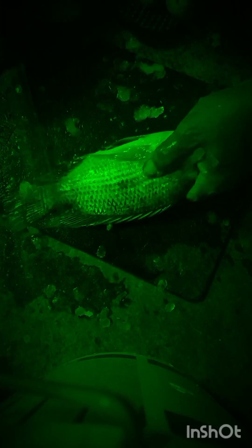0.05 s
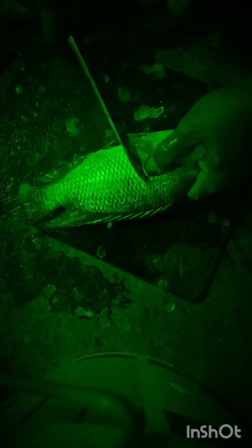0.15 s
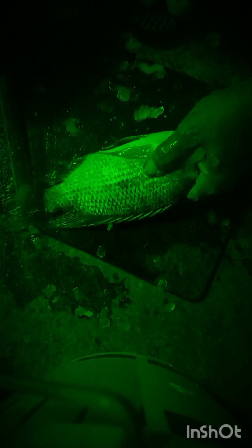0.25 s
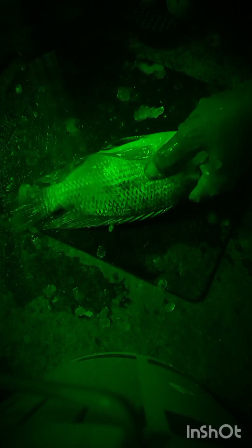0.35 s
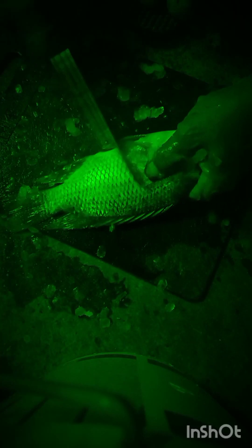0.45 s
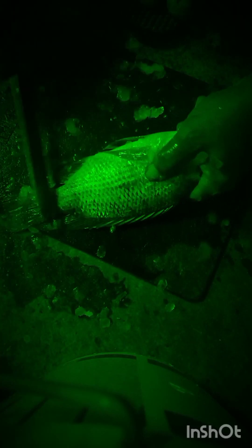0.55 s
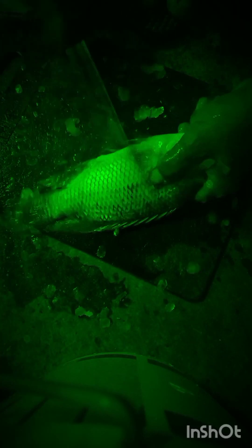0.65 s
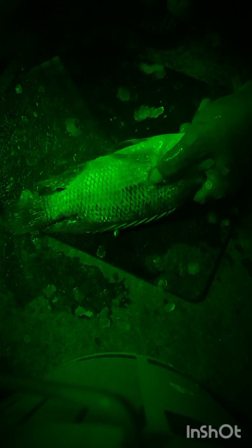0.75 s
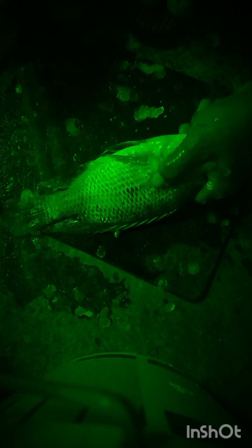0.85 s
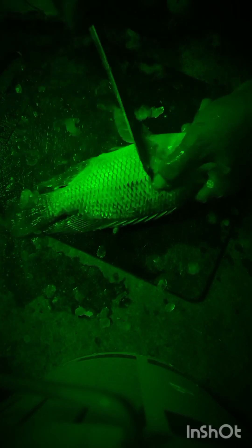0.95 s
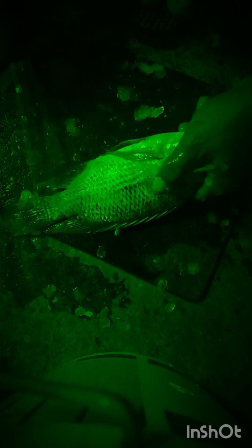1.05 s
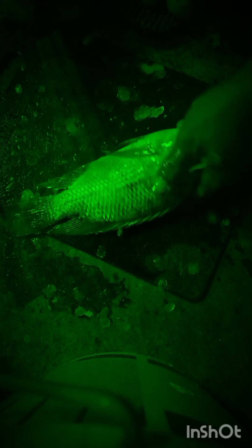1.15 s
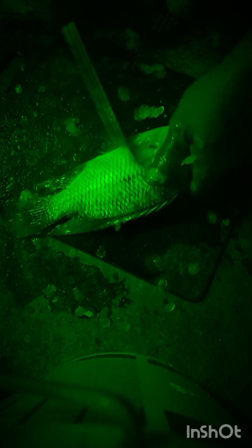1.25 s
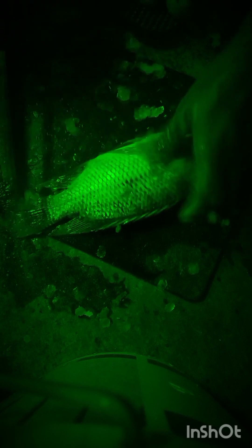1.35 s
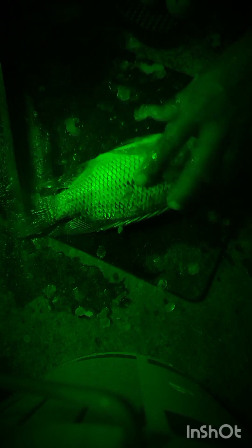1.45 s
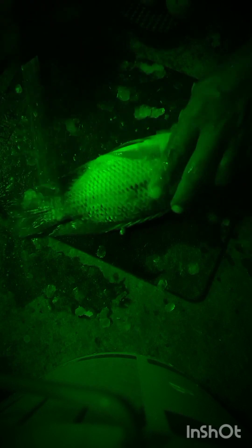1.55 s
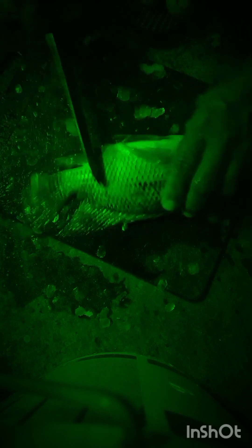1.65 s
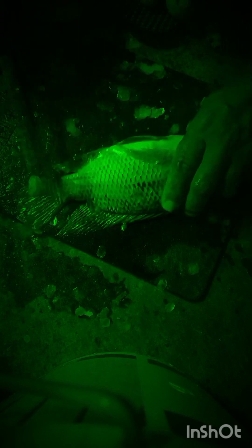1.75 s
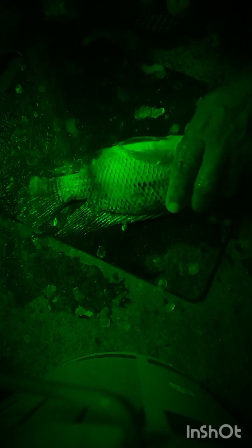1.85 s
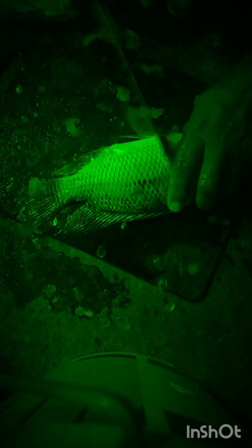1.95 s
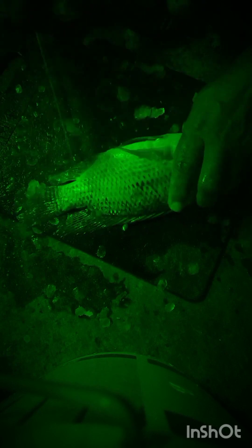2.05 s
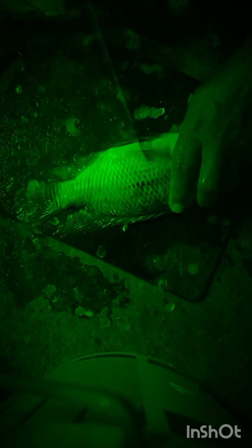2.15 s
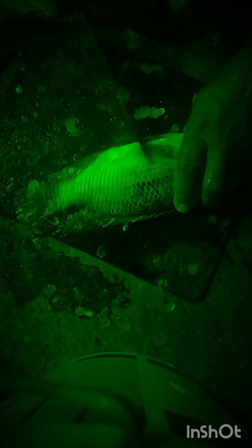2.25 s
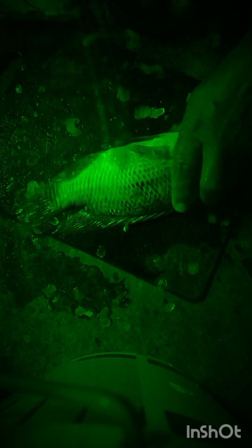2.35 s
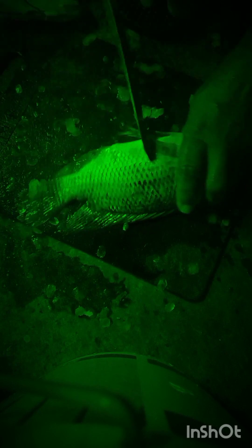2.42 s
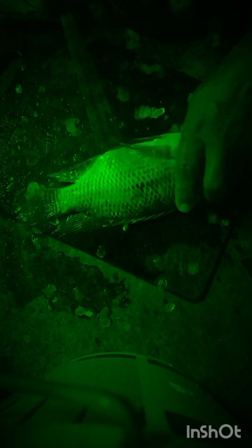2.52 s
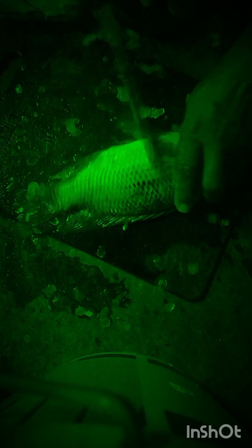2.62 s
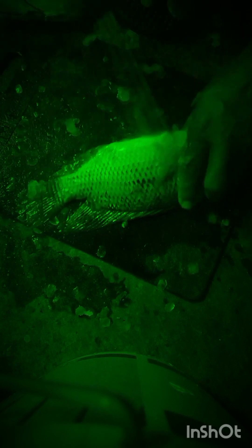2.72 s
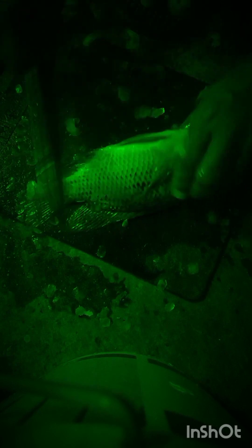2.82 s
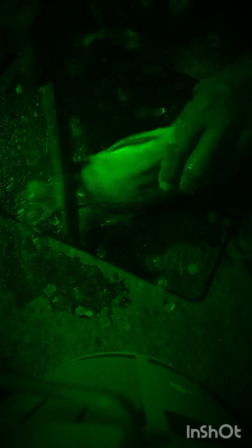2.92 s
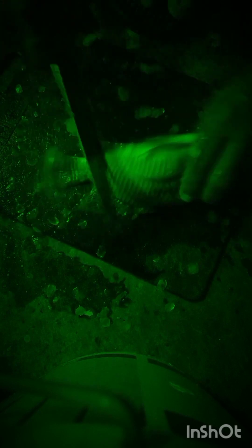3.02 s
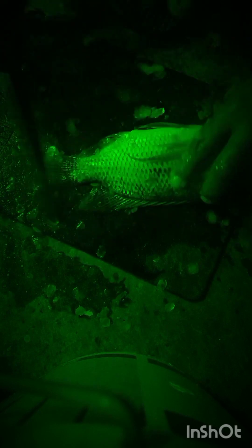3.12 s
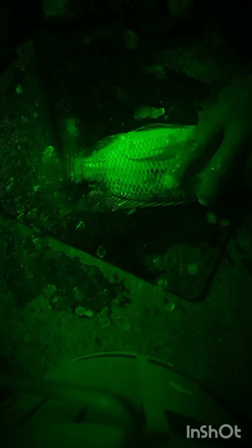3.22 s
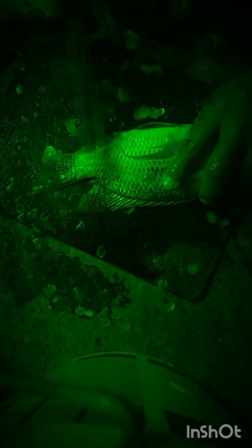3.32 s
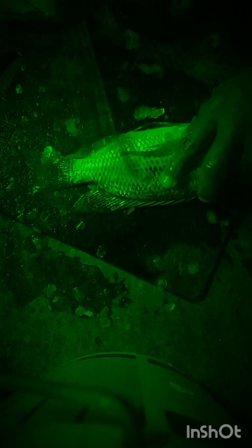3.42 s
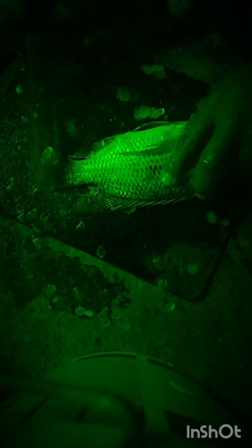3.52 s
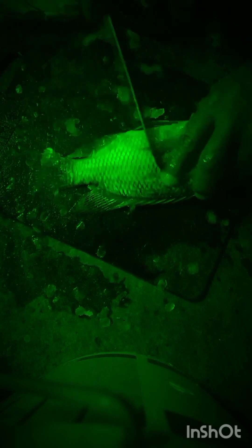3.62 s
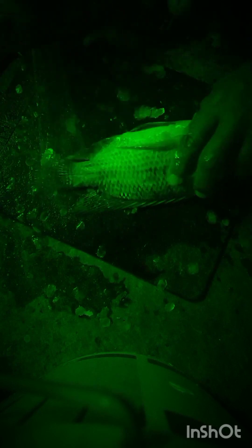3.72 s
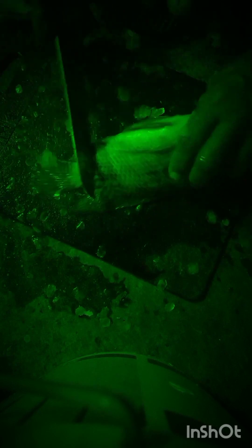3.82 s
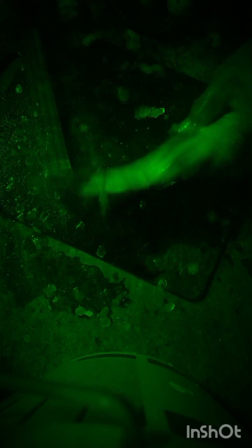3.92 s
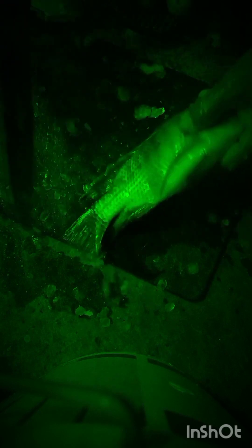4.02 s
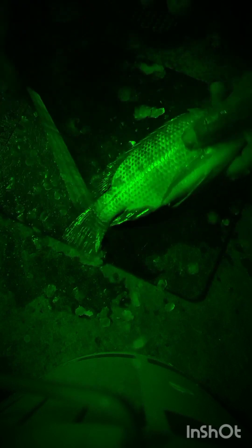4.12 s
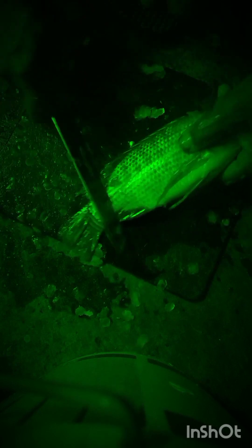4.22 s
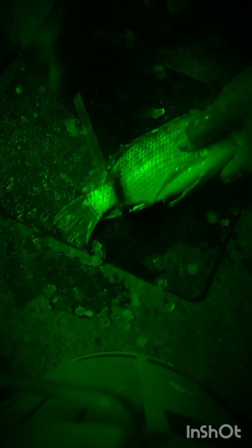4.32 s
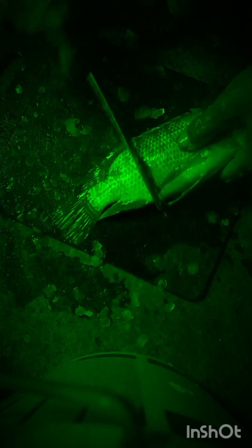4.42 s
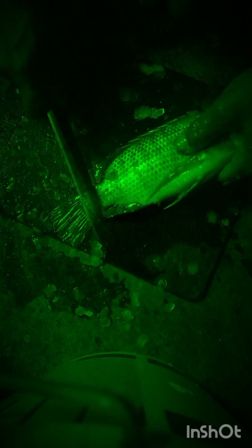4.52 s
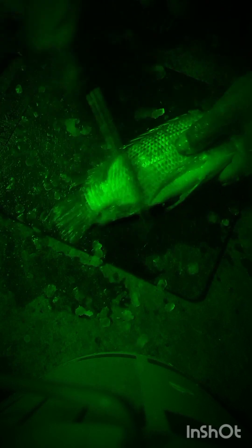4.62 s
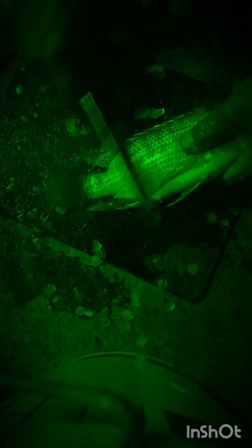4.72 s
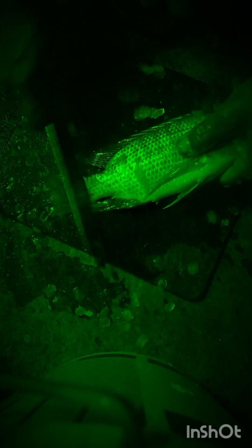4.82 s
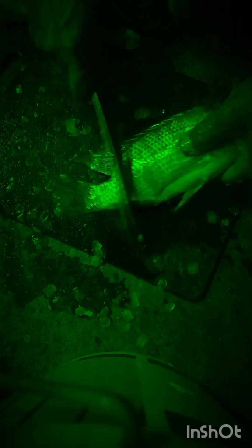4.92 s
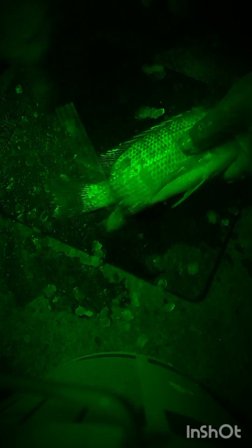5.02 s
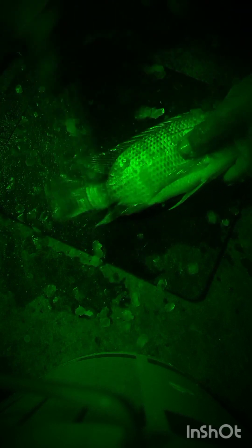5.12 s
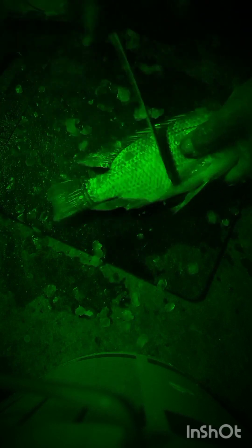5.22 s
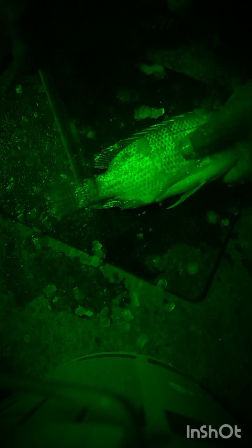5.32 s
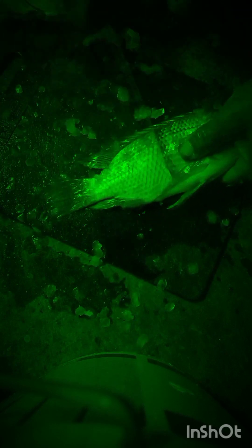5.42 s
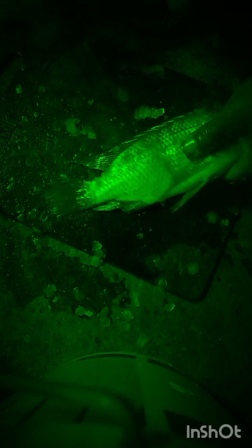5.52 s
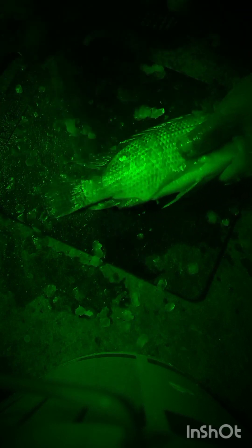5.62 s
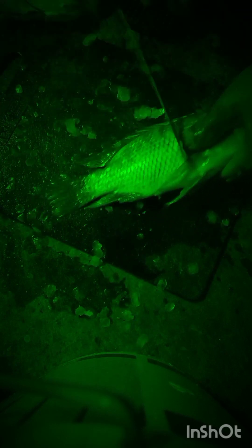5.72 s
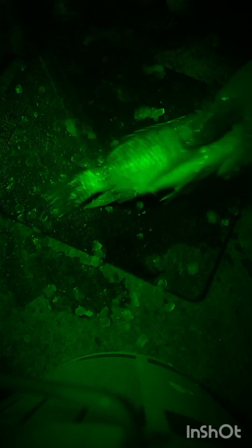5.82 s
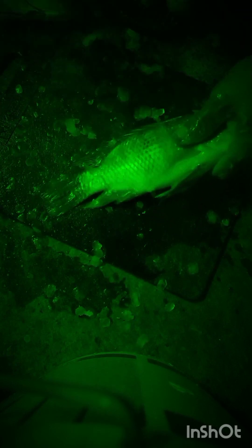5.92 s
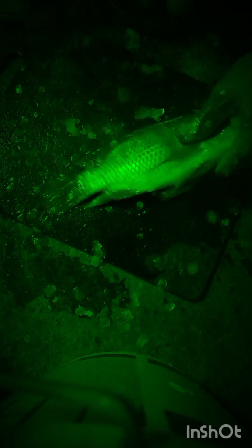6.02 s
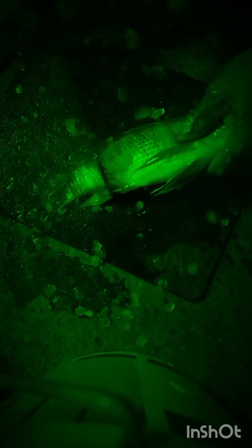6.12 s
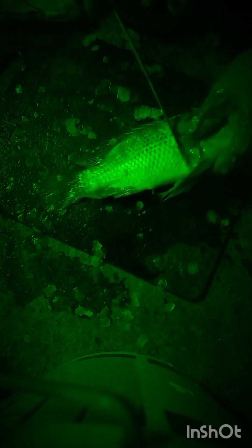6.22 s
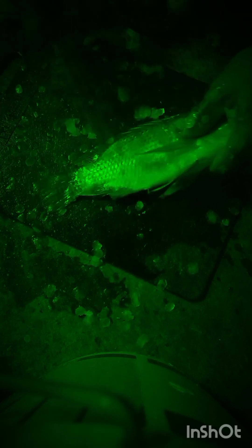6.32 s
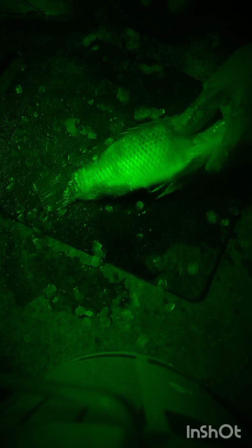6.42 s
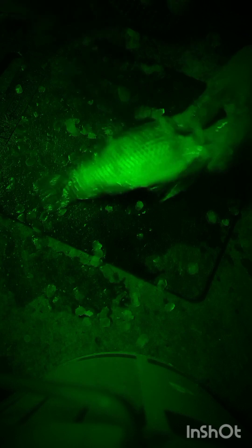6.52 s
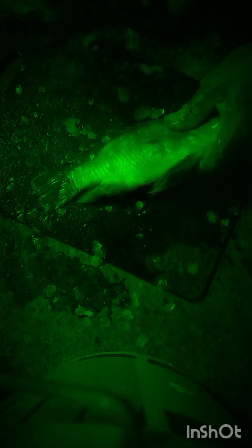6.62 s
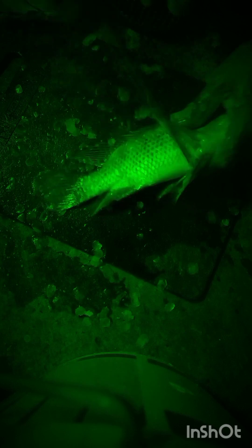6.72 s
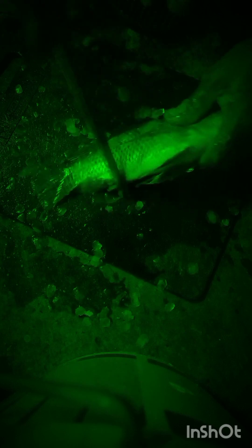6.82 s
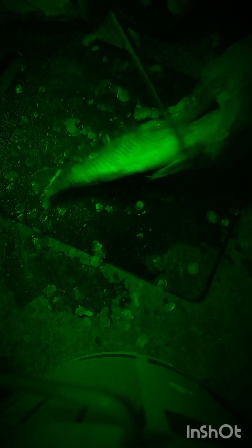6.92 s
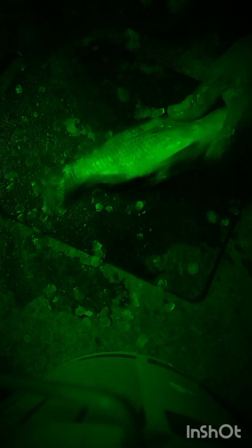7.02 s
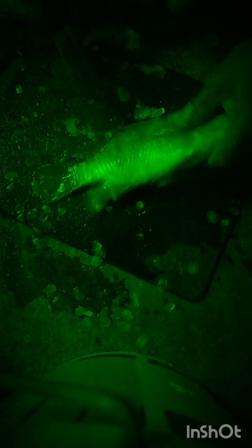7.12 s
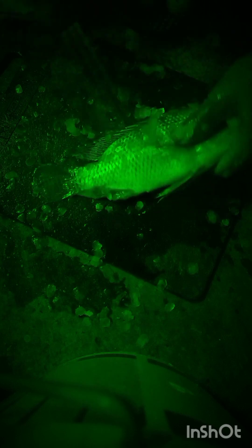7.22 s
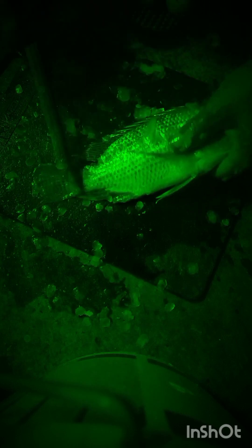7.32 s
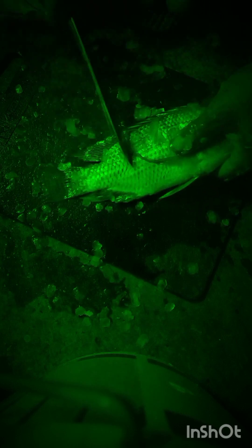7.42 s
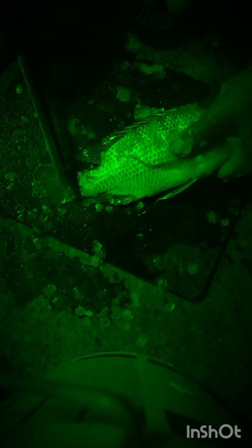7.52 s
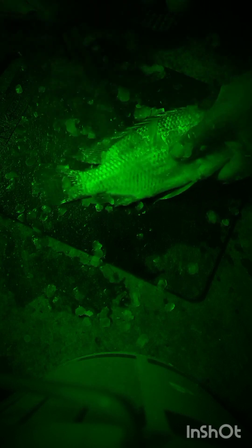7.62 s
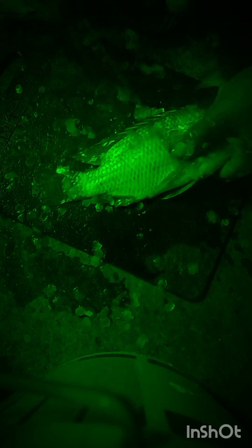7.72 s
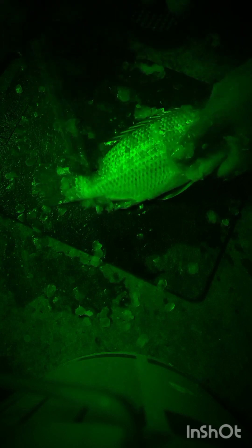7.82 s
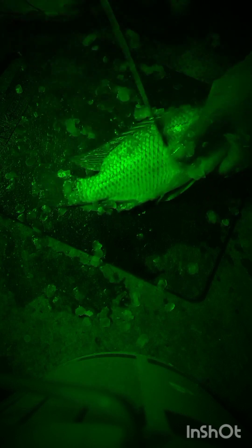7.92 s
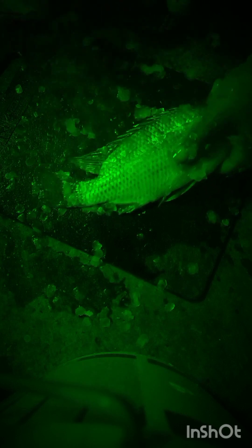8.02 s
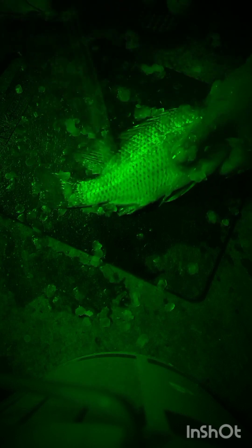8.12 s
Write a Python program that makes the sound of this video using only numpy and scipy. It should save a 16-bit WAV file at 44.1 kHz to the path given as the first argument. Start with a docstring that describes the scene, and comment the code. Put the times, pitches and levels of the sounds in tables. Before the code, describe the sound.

A knife scales a wet fish on a board, close to a stereo phone microphone outdoors at night. From 0.1 s short rasping strokes come about four a second, each a dense gritty crackle of scales with thin steel ring, soft wet drag and hollow board chatter. Tiny flicks and snaps tick between them. A dull double knock falls at 1.6 s, before lighter strokes. From 2.6 to 3.2 s the scraping turns faint, then firms up with small knocks; a wider gap follows 3.9 s. At 4.4 s strong scraping returns, densest from 4.5 to 5.8 s, with sharp scale cracks and cushioned thuds. From 6 to 7.2 s it is steadier and lighter, the ring slightly lower; from 7.4 s strokes become brighter and crisper until 8.1 s. Close reflections and a faint yard tail surround it, over a low distant drone and fluttering insect-like shrill.

```python
"""Scaling a fish at night

Outdoors, a knife scrapes a fish on a board, about four strokes a second, heard by a phone close by.
Each stroke is a dense run of scale edges letting go, with blade ring, wet skin drag and board chatter:
random slips, filtered and faded in and out. Light flicks, snapping scales (short noise bursts) and
knocks (filtered impulses) come among them. Close reflections and a faint yard tail surround the work;
a distant drone and a thin insect-like shrill, both coloured noise, lie behind."""
import sys
import numpy as np
from scipy import signal
from scipy.fft import rfft, irfft, next_fast_len
from scipy.io import wavfile
from scipy.ndimage import map_coordinates

SR = 44100
rng = np.random.default_rng(int(sys.argv[2]) if len(sys.argv) > 2 else 0)


def dump_mix(stems):
    """Bounce the given channels to the path in sys.argv[1] as a 16-bit WAV at rate SR."""
    frames = np.atleast_2d(stems).T  # one column per channel
    limited = np.clip(frames, -1, 1)  # hard clip at full scale
    pcm = np.round(limited * 32767).astype(np.int16)
    wavfile.write(sys.argv[1], SR, pcm)


N = 359756  # samples

# All levels in the tables are relative: mix gains and filters follow.
# Working strokes against the scales. Each row: start in seconds, lead-in in seconds, length in seconds,
# scale rasp in dB, blade ring in dB, skin drag in dB, board chatter in dB, board note in Hz,
# rasp brightness in dB.
STROKES = [(0.114, 0.0092, 0.091, -39.5, -59, -51.0, -46, 801.4, 5.5),
           (0.387, 0.053, 0.075, -39.5, -54, -54.5, -44.5, 762.6, -2.5),
           (0.67, 0.013, 0.07, -43.5, -48.5, -56, -45.5, 719.5, -4),
           (0.924, 0.038, 0.061, -42, -46, -56, -49, 948, -1.5),
           (1.184, 0.051, 0.06, -46.5, -50, -59.5, -54.5, 863, -7),
           (1.623, 0.021, 0.04, -43.5, -52, -50.5, -43.5, 831, 4),
           (1.951, 0.05, 0.042, -47.5, -51.0, -56, -52.5, 726, -5),
           (2.184, 0.02, 0.035, -42.5, -46, -60, -56, 726, -1),
           (2.418, 0.01, 0.03, -46, -42.5, -57.5, -56.5, 710.0, 2),
           (2.658, 0.046, 0.084, -52, -57.5, -66, -69.0, 902, -2.5),
           (2.971, 0.01, 0.13, -57, -62.5, -80, -64.5, 852, 1),
           (3.158, 0.01, 0.065, -50, -44, -57.5, -47.5, 844.7, -8.5),
           (3.363, 0.031, 0.055, -45.5, -48.5, -59, -48, 873, 1),
           (3.606, 0.027, 0.064, -43, -47, -52, -39.5, 902, 0),
           (3.826, 0.042, 0.064, -50.5, -54, -59, -49.0, 821.4, -5),
           (4.369, 0.042, 0.073, -38, -47.0, -58, -56, 995, -2.5),
           (4.644, 0.033, 0.062, -34.5, -42.5, -49.5, -46.0, 1023, -0.5),
           (4.916, 0.034, 0.061, -40.5, -41, -47, -42.5, 960, -1),
           (5.184, 0.052, 0.094, -36.5, -41, -51, -44.5, 982, 0.5),
           (5.43, 0.015, 0.053, -39, -47, -47, -39.5, 1072, -4.5),
           (5.71, 0.04, 0.0659, -40, -43, -52, -44, 986.5, -3),
           (5.94, 0.012, 0.057, -37, -42.5, -55.5, -50.0, 900.6, -2),
           (6.209, 0.028, 0.033, -40, -44, -50.0, -49.5, 744.3, -2),
           (6.454, 0.027, 0.035, -41.5, -44, -55, -54.5, 726.0, -1.5),
           (6.654, 0.012, 0.061, -45, -45.5, -57.5, -58, 660.0, 1),
           (6.905, 0.0093, 0.036, -46.5, -45.5, -58, -55.5, 648, 4.5),
           (7.161, 0.012, 0.047, -45.5, -51, -65.5, -58, 701.4, -1),
           (7.406, 0.026, 0.055, -44, -52, -56, -43.0, 911, 8.5),
           (7.638, 0.031, 0.072, -46, -46, -50.0, -41, 949.6, 11),
           (7.899, 0.026, 0.057, -37, -43.5, -51.5, -47, 990.5, 0.5)]
# Light flicks and return passes of the edge. Each row: start in seconds, length in seconds,
# scale rasp in dB, blade ring in dB, push on the fish in dB.
FLICKS = [ (0.02, 0.011, -49, -85, -95), (0.265, .06, -57, -67, -61), (0.513, 0.041, -62, -72, -64),
          (0.55, 0.085, -60, -83, -65.5), (0.901, 0.021, -59, -71, -62), (1.09, .045, -76, -65, -70),
          (1.592, .026, -66, -70, -49), (1.767, 0.017, -59, -65, -67.5), (2.065, .06, -60, -63, -73),
          (2.338, 0.05, -51, -60.5, -68), (2.537, 0.076, -60.5, -66, -98), (3.035, 0.031, -64, -66, -59),
          (3.312, 0.057, -53, -54, -76), (3.745, 0.066, -56.5, -61, -62.5),
          (3.918, 0.049, -58.5, -59, -60.5), (4.046, .025, -58.5, -75, -62.5),
          (4.266, 0.017, -48.5, -53.5, -89), (4.539, 0.016, -31.5, -66, -60.5),
          (4.563, 0.034, -42, -44.5, -58.5), (4.745, .045, -45, -61, -81), (4.797, .025, -38, -63, -57),
          (4.842, 0.018, -42, -48, -54.5), (5.052, 0.016, -41, -42.5, -69), (5.1, 0.017, -56, -50, -62.5),
          (5.152, 0.035, -48, -63, -59), (5.36, .04, -51.5, -73, -53.5), (5.501, 0.018, -44, -40, -56),
          (5.6, 0.03, -49, -57, -57), (5.857, 0.023, -51, -58, -61), (6.098, 0.025, -50, -51, -63.5),
          (6.172, 0.017, -44.5, -46.5, -53), (6.357, .03, -54, -61.5, -77), (6.577, 0.037, -52, -55, -60),
          (6.808, 0.037, -51, -51.5, -64), (7.538, 0.05, -48.5, -64, -55.5), (7.787, 0.057, -61, -69, -62),
          (8.087, 0.022, -52, -72, -84)]
# How a layer follows a stroke or flick. Each holds: rise over the lead-in in dB, sag at both ends of
# the hold in dB, growth over the hold in dB, fall in dB per second.
RASP_SHAPE = (23, 3.7, 0.54, 490)
RING_SHAPE = (18.3, 1.7, 0.38, 400)
SKIN_SHAPE = (21, 3.6, 4.8, 370)
BOARD_SHAPE = (13, 6.5, -4, 362)
FLICK_SHAPE = (16.5, 1.7, 0.3, 690)
FLICK_LEAD_S = 0.013
# The hand and resting blade keep rubbing the wet fish. Each row: time in seconds, level in dB.
HANDLING = [(0, -58.5), (1.25, -60.5), (1.42, -77.5), (1.9, -74), (2.101, -61.5), (2.72, -74), (2.881, -77),
            (3.05, -74), (4.221, -79.5), (4.65, -50), (5.35, -53), (5.9, -60), (6.7, -61.5), (7.0, -62.5),
            (7.6, -65), (8.15, -62)]
# Share of the handling in rasp, ring, skin and board, in dB.
HANDLING_MIX_DB = (-1, -6, -14, -16)
# How far rasp, ring, skin and board follow the unevenness, as a factor on its dB.
CATCH_SHARE = (1.15, 0.36, 1.45, 0.61)
HANDLING_UNEVEN_DB, GRIP_UNEVEN_DB = 2.5, 1.2  # the edge catches and skids; before CATCH_SHARE
# Colour of the scale contacts. Each row: frequency in Hz, gain in dB.
RASP_COLOUR = [(1500, -43), (2600, -9), (3600, -1.5), (6000, 1), (11000, 1), (16000, 0.5)]
RASP_SPLIT_HZ = 7600  # brightness tips the rasp about this frequency
# High modes of the steel blade. Each row: centre in Hz, width in Hz, level in dB.
BLADE_MODES = [(5380, 150, -8.5), (6210, 150, -7), (11200, 50, -22), (12200, 91, 2)]
# Bending modes of the hand-damped blade. Each row: centre in Hz, width in Hz, level in dB.
BENDING_MODES = [(2569, 88, -1), (2750, 110, -14)]
# Note of the blade, drifting under the load of the grip. Each row: time in seconds, note in Hz.
BLADE_NOTE = [(0, 2616), (2.402, 2596), (5.3, 2587), (6.2, 2503), (6.9, 2430), (7.4, 2558), (8.15, 2577)]
# Colour of the wet skin drag. Each row: frequency in Hz, gain in dB.
SKIN_COLOUR = [(20, -41), (40, -18.5), (90, 3.5), (130, 8.5), (170, -3.5), (230, 3.5), (350, 6), (480, 2),
               (900, -13), (1400, -7.5), (2100, 0.5), (3400, -1.5), (6000, -8.5), (12000, -53)]
# Resonances of the board. Each row: centre in Hz, width in Hz, level in dB.
BOARD_MODES = [(725, 59, -3.5), (895.8, 172, 4), (1216, 240, -13), (1570, 250, -15)]
# Single scales snapping free. Each row: time in seconds, level in dB.
SNAPS = [(0.0285, -37), (0.306, -26), (0.5085, -32), (0.527, -28), (0.6103, -38), (0.724, -22),
         (0.835, -35), (0.905, -26), (1.128, -35), (1.2096, -22), (1.7076, -30.5), (1.982, -23.5),
         (2.1867, -18.5), (2.192, -26), (2.3404, -32), (2.4262, -22), (2.619, -33), (4.4586, -41),
         (4.5413, -27), (4.6883, -19), (4.6936, -12.5), (4.8387, -15.5), (4.8566, -16), (4.966, -36),
         (4.987, -14.5), (5.1, -22), (5.1034, -18.5), (5.3521, -27), (5.473, -29), (5.529, -36),
         (5.7638, -15), (6.104, -28.5), (6.582, -27.5), (6.65, -34), (6.8104, -31), (7.1033, -25),
         (7.158, -26), (7.341, -33.5), (7.4751, -30), (7.5654, -17), (7.7025, -24), (7.7866, -27.5),
         (7.9594, -14)]
# The blade landing on the board through the fish. Each row: time in seconds, level in dB.
KNOCKS = [(1.583, -17.5), (1.607, -22), (3.035, -39), (3.087, -31), (3.113, -39), (3.151, -27),
          (3.366, -36), (3.551, -35.5), (3.604, -33), (3.843, -27), (4.649, -23), (4.927, -20.5),
          (5.2, -17.5), (5.222, -25), (5.435, -27), (5.693, -19.5), (7.421, -32), (7.628, -22.5)]
# Colour of the dull thud in a knock. Each row: frequency in Hz, gain in dB.
THUD_COLOUR = [(40, -24), (120, 7), (300, 3), (700, 11), (1200, 1), (2000, -8), (3500, -34), (8000, -70)]
KNOCK_SOFT_HZ = 1440  # the flesh cushions away what lies above
# Close reflections over the direct sound. Each row: frequency in Hz, ratio in dB.
SCATTER = [(100, -9), (700, 1), (2500, 3), (6000, 5), (15000, 7)]
# Decay of the yard. Each row: frequency in Hz, time to fall 60 dB in seconds.
YARD_DECAY = [(150, 0.084), (1000, 0.27), (5000, 0.17), (14000, 0.11)]
# Spectrum of the distant drone. Each row: frequency in Hz, density in dB per Hz.
DRONE = [(25, -30), (45, -14), (65, -1.5), (84, 5.5), (110, -0.5), (180, -15), (350, -19.5), (800, -28.5),
         (1500, -34.5), (3000, -61), (6000, -48), (12000, -42)]
# Spectrum of the insect-like shrill. Each row: frequency in Hz, density in dB per Hz.
SHRILL = [(4500, -31), (5900, -20), (6400, -8), (6600, -1.5), (6780, -10.5), (7400, -22), (8200, -18),
          (9100, -15), (10200, -20), (11300, -16), (12200, -29), (16000, -50)]
# The two microphone ports. Each row: frequency in Hz, left gain in dB, right gain in dB.
PORTS = [(130, -14.5, 2.5), (200, -10, 4), (386, 1, 2.5), (615, -3, 6.5), (1075, 3, 4), (1470, 4, -1.5),
         (2710, 0, 2), (3550, 0.5, -8.5), (6000, 5, -11.5), (6980, 3.5, -19), (7360, -6.5, -19),
         (10400, -0.5, -1.5), (13000, 2.5, -5.5), (15500, -1.5, -14.5)]
# Air resonances, one list for the left port and one for the right. Each row: centre in Hz,
# width in Hz, level in dB.
CAVITIES = [
    [(6740, 246, -6)],
    [(6600, 210, 7.5)],
]
LAG = 23.5 / SR  # seconds by which the direct sound is later at the right port
TOP_HZ = 16050  # upper band limit


def scraping():
    """Each stroke rasps the scales, rings the blade, drags the wet skin and shakes the board."""
    rasp_gain, ring_gain, skin_gain, board_gain = contact()
    *_, notes_hz, brightness_db = np.transpose(STROKES)
    rasp = amp(5.0) * rasp_gain * scale_rasp(per_stroke(brightness_db))
    ring = amp(2.57) * ring_gain * blade_ring()
    skin = amp(8.5) * skin_gain * skin_drag()
    chatter = amp(1.06) * board_gain * board_chatter(per_stroke(notes_hz))
    return rasp + ring + skin + chatter


def scale_rasp(bright_db):
    """A dense run of small scale edges, with sparser big ones ticking out of it."""
    small = slips(rate=1700, spread_db=4.5, clump_db=1.6, smear=0.44)
    big = slips(rate=150, spread_db=2.5, clump_db=1.5, smear=0)
    rasp = unit(filtered(small + amp(-3.0) * big, scale_on_steel))
    dull = filtered(rasp, lambda hz: 1 / (1 + (hz / RASP_SPLIT_HZ) ** 6))
    bright = rasp - dull
    return amp(-bright_db / 2) * dull + amp(bright_db / 2) * bright


def scale_on_steel(hz):
    """Response of a scale contact with the high modes of the blade added."""
    return colour(RASP_COLOUR, hz) * (1 + ringing(BLADE_MODES, hz))


def blade_ring():
    """Slips excite the bending modes; the flesh loads the blade unevenly, so its note wanders."""
    excitation = slips(rate=1200, spread_db=7.0, clump_db=1.5, smear=0.56)
    ring = filtered(excitation, lambda hz: ringing(BENDING_MODES, hz) * ringing([(2590, 1400, 0)], hz))
    note_hz = np.interp(np.arange(N) / SR, *np.transpose(BLADE_NOTE))
    return glide(ring, note_hz / BENDING_MODES[0][0] * (1 + 0.005 * wobble(9)))


def skin_drag():
    """Fine slips of the edge over wet skin, in the colour of the skin."""
    drag = slips(rate=1500, spread_db=3.0, clump_db=2.0, smear=0.41)
    return unit(filtered(drag, lambda hz: colour(SKIN_COLOUR, hz)))


def board_chatter(note_hz):
    """Slips shake the board, whose resonances move with the note of each stroke."""
    shaking = slips(rate=700, spread_db=2.5, clump_db=2.5, smear=0.31)
    chatter = filtered(shaking, lambda hz: ringing(BOARD_MODES, hz) * ringing([(930, 1100, 0)], hz))
    return glide(chatter, note_hz / BOARD_MODES[1][0])


def slips(rate, spread_db, clump_db, smear):
    """Tiny releases of uneven size on a smooth rub, bunched as the edge crosses rows of scales; rms 1."""
    times = rng.random(N) < rate / SR
    signs = rng.choice([-1, 1], N)
    sizes = amp(spread_db * np.clip(rng.standard_normal(N), -2, 2))
    rub = smear * rng.standard_normal(N)
    bunching = amp(clump_db * np.clip(wobble(260), -2, 2))
    return unit((unit(times * signs * sizes) + rub) * bunching)


def contact():
    """Gains of rasp, ring, skin and board: strokes, flicks and the handling between them."""
    start, lead, length, *stroke_db, _, _ = np.transpose(STROKES)
    flick_start, flick_length, rasp_db, ring_db, push_db = np.transpose(FLICKS)
    flick_lead = np.full(len(FLICKS), FLICK_LEAD_S)
    flick_db = (rasp_db, ring_db, push_db - 4.5, push_db)  # the push drives skin and board
    shapes = (RASP_SHAPE, RING_SHAPE, SKIN_SHAPE, BOARD_SHAPE)
    handling_db = np.interp(np.arange(N) / SR, *np.transpose(HANDLING))
    catch_db = HANDLING_UNEVEN_DB * wobble(45)
    grip_db = GRIP_UNEVEN_DB * wobble(80)
    gains = []
    for heavy, light, shape, mix_db, share in zip(stroke_db, flick_db, shapes, HANDLING_MIX_DB, CATCH_SHARE):
        strokes = passes(start, lead, length, heavy, shape)
        flicks = passes(flick_start, flick_lead, flick_length, light, FLICK_SHAPE)
        handling = amp(handling_db + mix_db + share * catch_db)
        gains.append(amp(share * grip_db) * np.hypot(np.sqrt(strokes + flicks), handling))
    return gains


def passes(starts, leads, lengths, levels_db, shape):
    """Power over time of passes that rise, hold in a shallow arch and fall away."""
    rise_db, sag_db, growth_db, fall = shape
    power = np.zeros(N)
    for start, lead, length, db in zip(starts, leads, lengths, levels_db):
        first = max(0, int(start * SR) - SR // 8)
        last = min(N, int((start + length) * SR) + SR // 5)
        span = np.arange(first, last)
        t = span / SR - start
        place = np.clip(t / length, 0, 1) - 0.5  # -0.5 to 0.5 over the hold
        hold_db = growth_db * place - sag_db * (2 * place) ** 2
        before_db = rise_db * np.maximum(-t, 0) / lead
        after_db = fall * np.maximum(t - length, 0)
        power[span] += amp(db + hold_db - before_db - after_db) ** 2
    return power


def per_stroke(values):
    """One value per stroke as a curve: held during each stroke, sliding between them."""
    start, _, length, *_ = np.transpose(STROKES)
    corners = np.c_[start, start + length].ravel()
    return np.interp(np.arange(N) / SR, corners, np.repeat(values, 2))


def glide(x, speed):
    """x read at a varying speed, which scales all its resonances; rms 1."""
    return unit(map_coordinates(x, [np.cumsum(speed) % (N - 1)]))


def snaps(tear_t60=0.038, crack=3.3):
    """A scale cracks loose and tears off in a short noise burst, ringing the blade."""
    out = np.zeros(N + SR)
    t = np.arange(SR // 20) / SR
    for start, db in SNAPS:
        tear = rng.standard_normal(len(t)) * amp(-60 * t / tear_t60)
        tear[0] = crack
        out[round(start * SR):][:len(t)] += amp(db - 8.5) * tear
    return filtered(out[:N], scale_on_steel)


def knocks(thud_db=-18.5):
    """Blows cushioned by the flesh: a dull thud and the short ring of the board."""
    blows = np.zeros(N)
    for start, db in KNOCKS:
        blows[round(start * SR)] = amp(db + 25.5)

    def cushioned_board(hz):
        """Second-order low-pass of the flesh on the ring and thud of the board."""
        ratio = hz / KNOCK_SOFT_HZ
        cushion = 1 / (1 + 1j * np.sqrt(2) * ratio - ratio ** 2)
        ring = ringing(BOARD_MODES, hz) * ringing([(880, 470, 0.00035)], hz)
        return cushion * (ring + amp(thud_db) * colour(THUD_COLOUR, hz))

    return filtered(blows, cushioned_board)


def surroundings(x, near_t60=0.012, yard_db=-11):
    """Direct sound reaches the left port first; hand, fish and board scatter it, the yard answers faintly."""
    near = lambda hz: amp(along(SCATTER, hz))
    side = np.array([[1], [-1]])  # left early, right late, half the lag each
    direct = filtered(x, lambda hz: np.exp(1j * np.pi * hz * LAG * side) / np.hypot(1, near(hz)))
    close = scattered(filtered(x, lambda hz: near(hz) / np.hypot(1, near(hz))), near_t60, count=10)
    # the yard's echo is noise that dies away at its own pace in each band
    noise = rng.standard_normal((2, SR // 3))
    hz, when, z = signal.stft(noise, SR, nperseg=256)
    decay = amp(-60 * when / along(YARD_DECAY, hz)[:, None])
    tail = signal.istft(z * decay, SR, nperseg=256)[1]
    yard = signal.fftconvolve(x[None], tail / np.linalg.norm(tail[0]), axes=1)[:, :N]
    return direct + close + amp(yard_db) * yard


def scattered(x, t60, count):
    """Close reflections, fading quickly from one pattern to another as the blade moves."""
    t = np.arange(SR // 25) / SR
    patterns = rng.standard_normal((count, 2, len(t))) * amp(-60 * t / t60)
    patterns /= np.linalg.norm(patterns, axis=2, keepdims=True)
    shares = np.array([wobble(22) for _ in patterns])
    shares /= np.linalg.norm(shares, axis=0)
    return sum(signal.oaconvolve((x * share)[None], pattern, axes=1)[:, :N]
               for share, pattern in zip(shares, patterns))


def night():
    """A far low drone and a high, fluttering shrill: noise of slowly and quickly wandering level."""
    drone = amp(-64 + 3.65 * wobble(4)) * air(DRONE, apart=0.61)
    shrill = amp(-63.5 + 3.6 * wobble(18)) * air(SHRILL, apart=2.9)
    return drone + shrill


def air(spectrum, apart):
    """Stereo noise of rms 1; apart is the size of the part that differs between the ports."""
    noise = rng.standard_normal(N) + apart * rng.standard_normal((2, N))
    return unit(filtered(noise, lambda hz: amp(along(spectrum, hz))))


def amp(db):
    """Decibels to gain."""
    return 10 ** (np.asarray(db) / 20)


def unit(x):
    """x at rms 1."""
    return x / np.sqrt(np.mean(x ** 2) + 1e-20)


def along(points, hz):
    """(Hz, value) points read on a log axis."""
    f, v = np.transpose(points)
    return np.interp(np.log(hz + 1), np.log(f + 1), v)


def wobble(rate):
    """A smooth random curve, rate knots a second."""
    knots = rng.standard_normal(int(N * rate / SR) + 4)
    return map_coordinates(knots, [np.arange(N) * rate / SR])


def filtered(x, response):
    """x times a complex response of frequency."""
    m = 2 * next_fast_len((N + SR) // 2)  # padded so that tails do not wrap round
    return irfft(rfft(x, m) * response(np.fft.rfftfreq(m, 1 / SR)), m)[..., :N]


def colour(points, hz):
    """Causal (minimum-phase) response with the gain of the (Hz, dB) points, by folding the cepstrum."""
    cepstrum = irfft(np.log(amp(along(points, hz))))
    half = len(cepstrum) // 2
    cepstrum[1:half] *= 2
    cepstrum[half + 1:] = 0
    return np.exp(rfft(cepstrum))


def ringing(modes, hz):
    """Causal response of (Hz, width in Hz, dB) resonances."""
    return sum(amp(db) * 1j * hz * width / (centre * centre - hz * hz + 1j * hz * width)
               for centre, width, db in modes)


def scene():
    """The work on the board in its open-air surroundings."""
    work = scraping() + snaps() + knocks()
    return surroundings(work) + night()


def record(dry):
    """Each port has its own colour and cavity resonances; nothing is kept above the band limit."""
    f, *sides_db = np.transpose(PORTS)

    def port(x, gain_db, cavity):
        """One microphone port."""
        points = np.c_[f, gain_db]
        return filtered(x, lambda hz: colour(points, hz) * (1 + ringing(cavity, hz)) * (hz < TOP_HZ))

    return np.array([port(x, gain_db, cavity) for x, gain_db, cavity in zip(dry, sides_db, CAVITIES)])


dry = scene()
out = record(dry)
dump_mix(out)
```